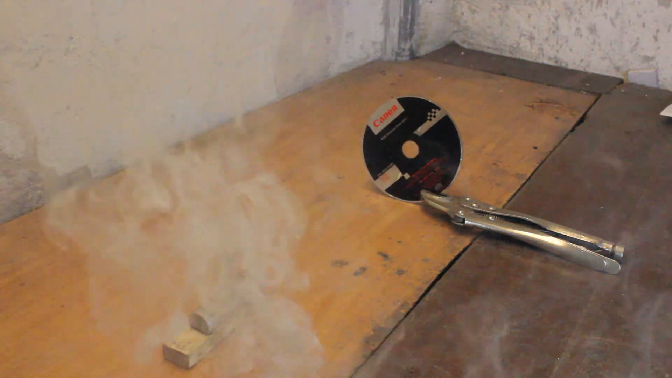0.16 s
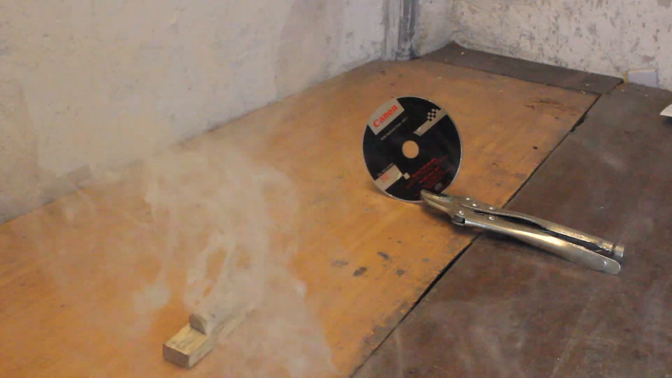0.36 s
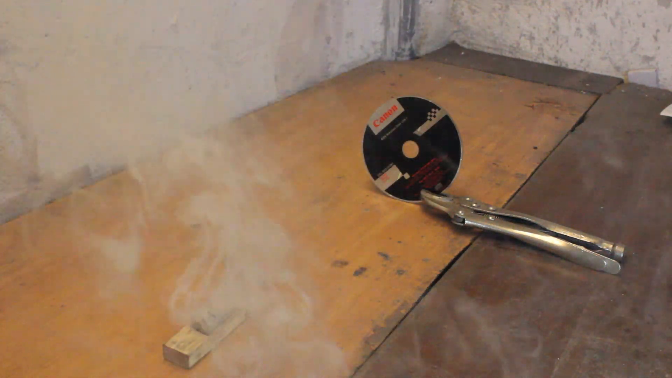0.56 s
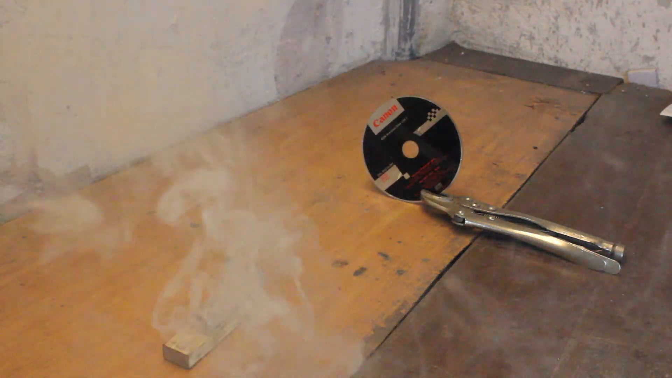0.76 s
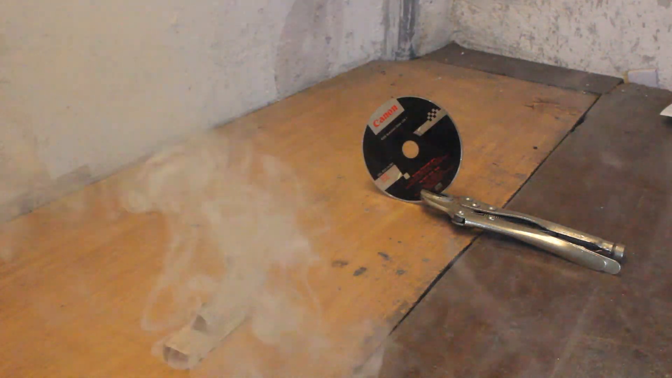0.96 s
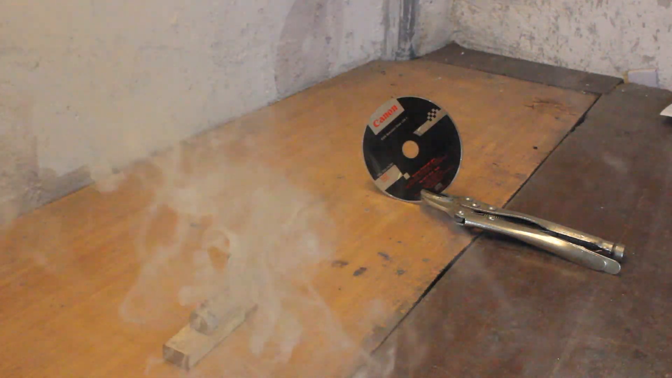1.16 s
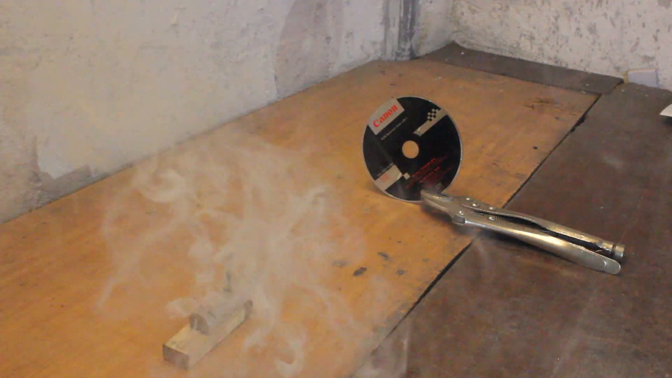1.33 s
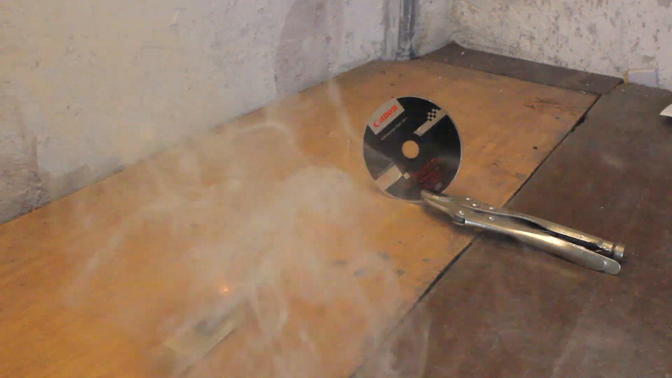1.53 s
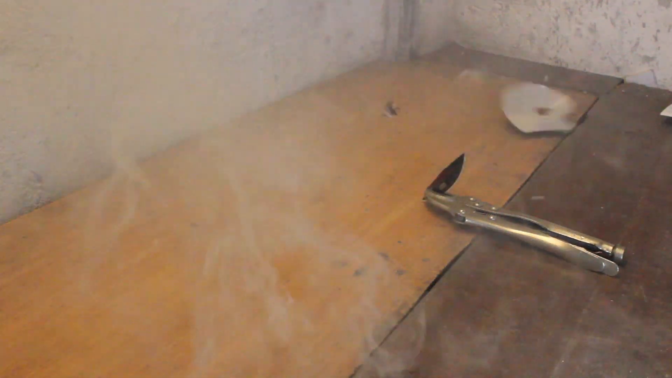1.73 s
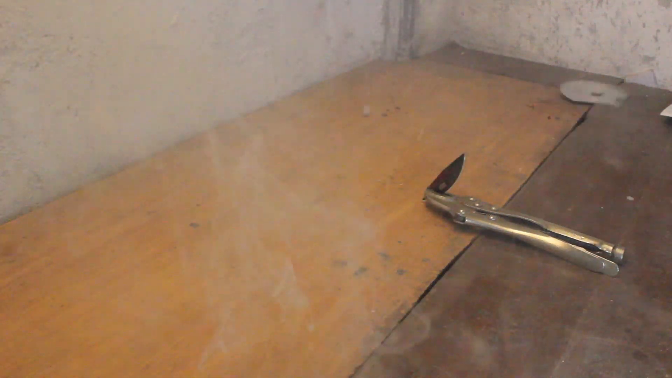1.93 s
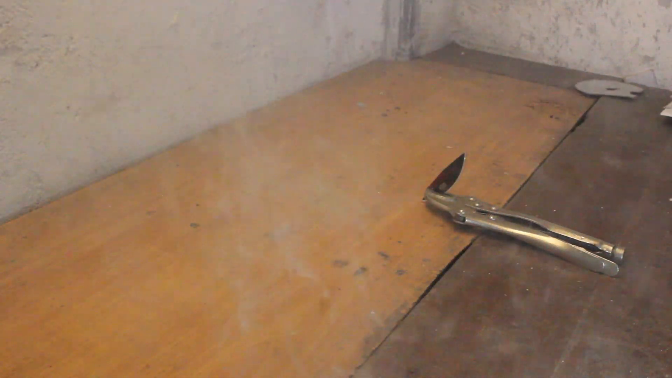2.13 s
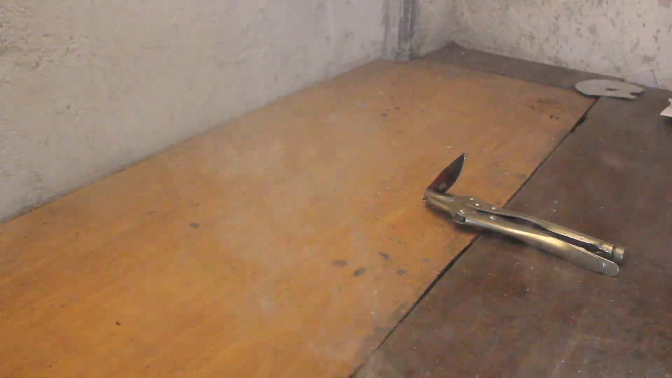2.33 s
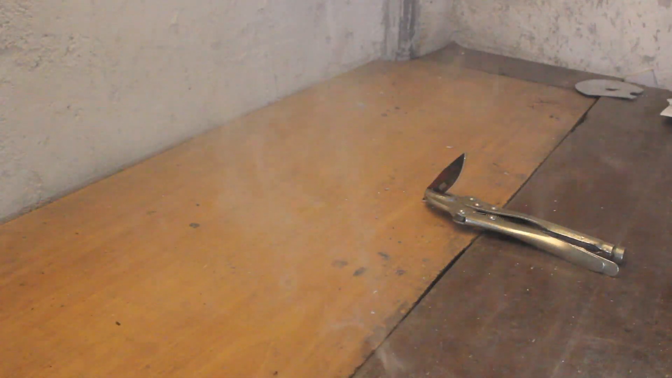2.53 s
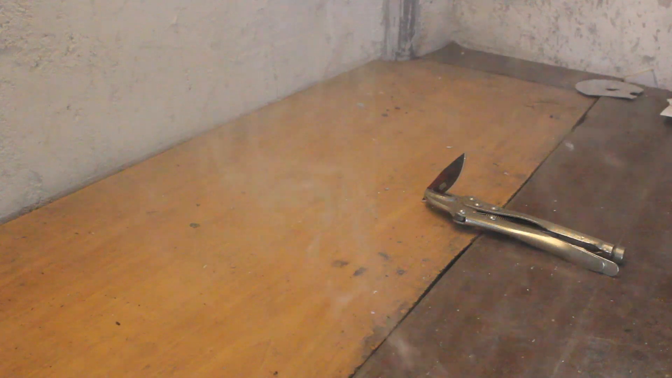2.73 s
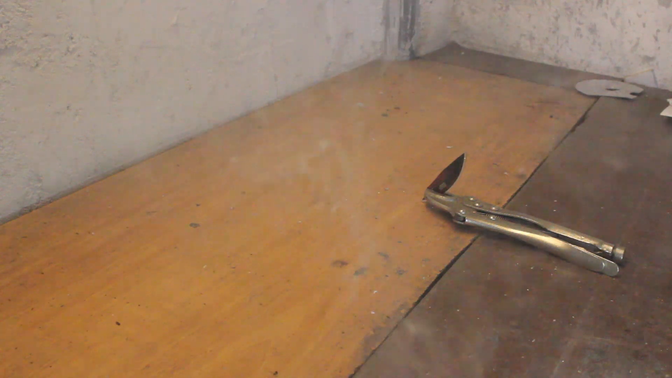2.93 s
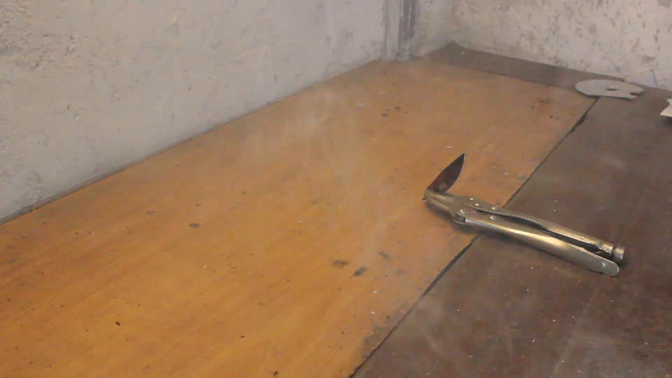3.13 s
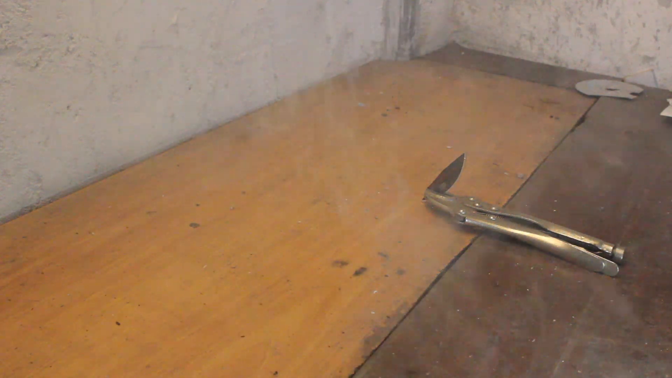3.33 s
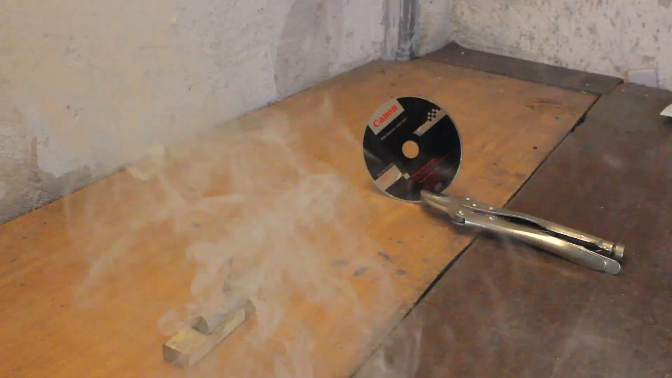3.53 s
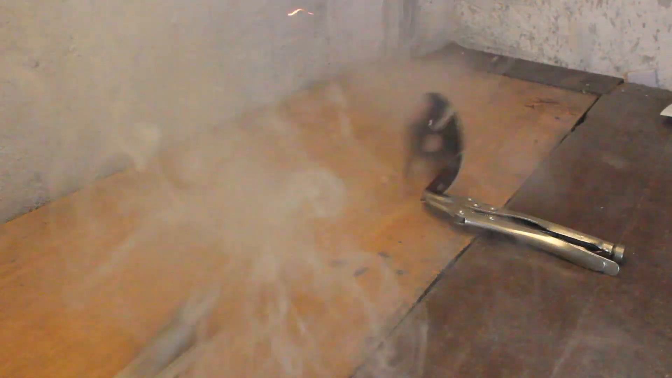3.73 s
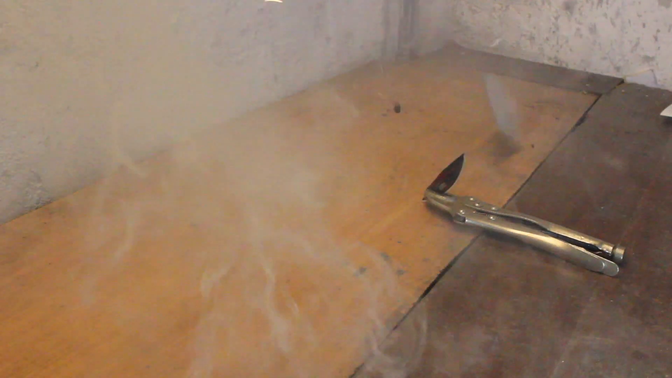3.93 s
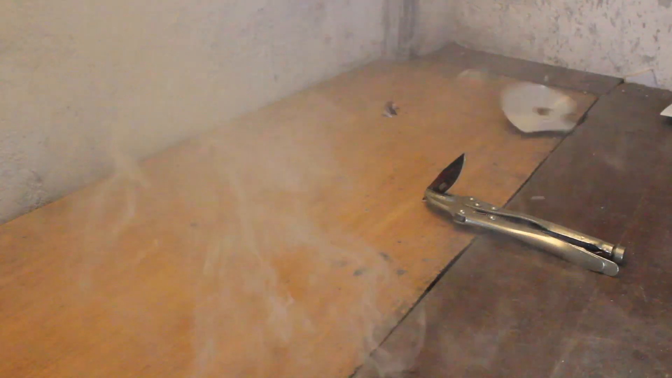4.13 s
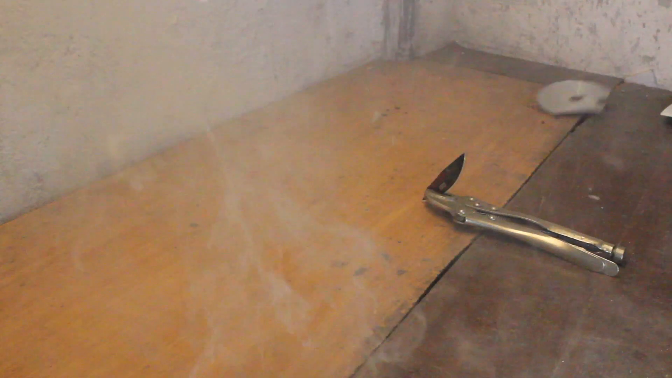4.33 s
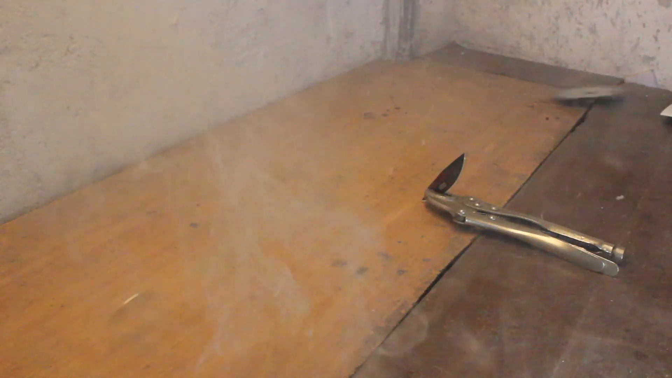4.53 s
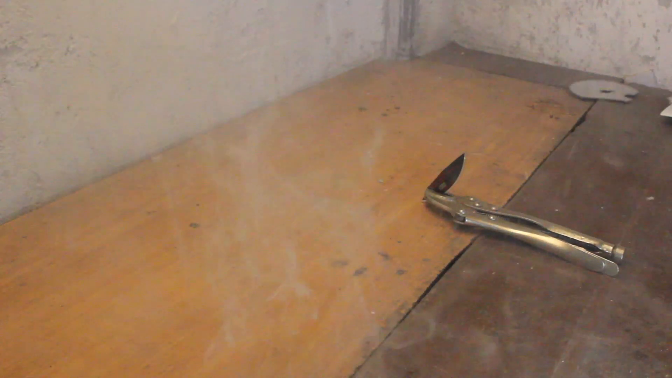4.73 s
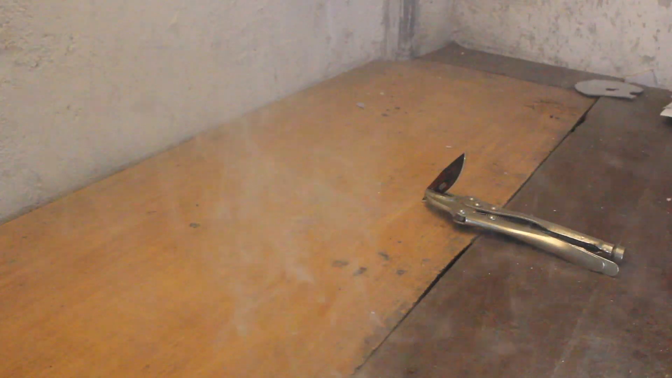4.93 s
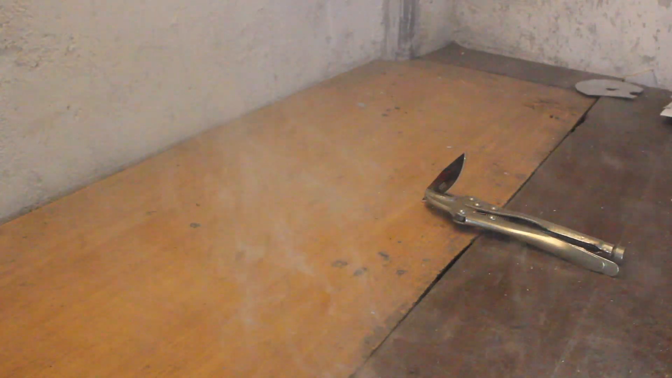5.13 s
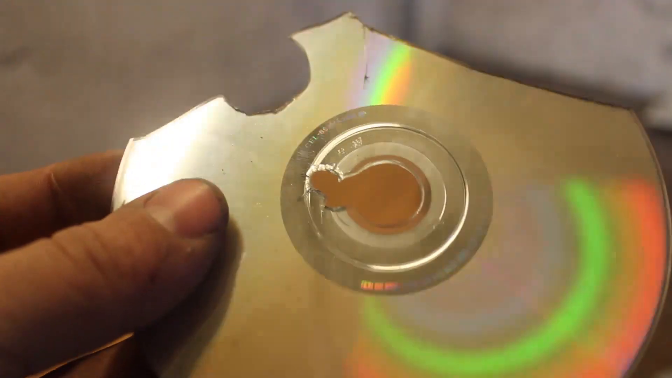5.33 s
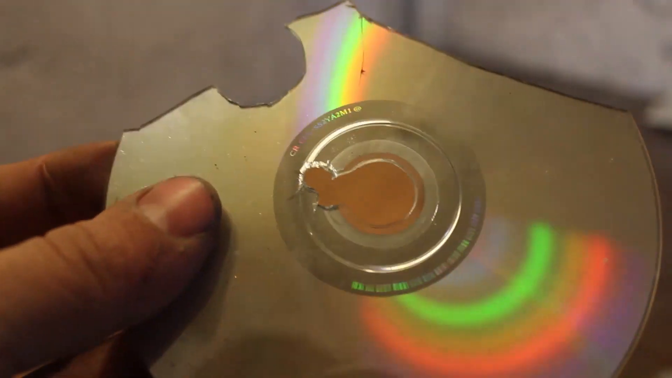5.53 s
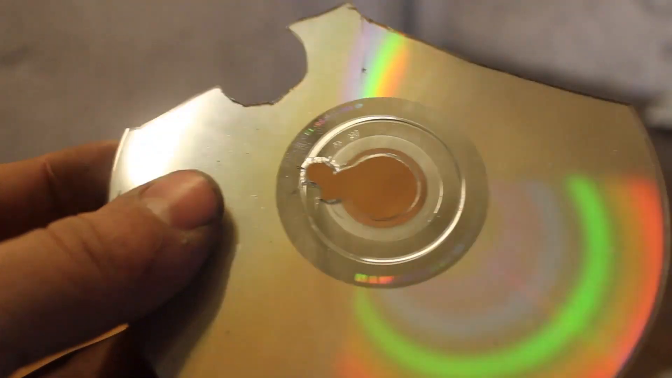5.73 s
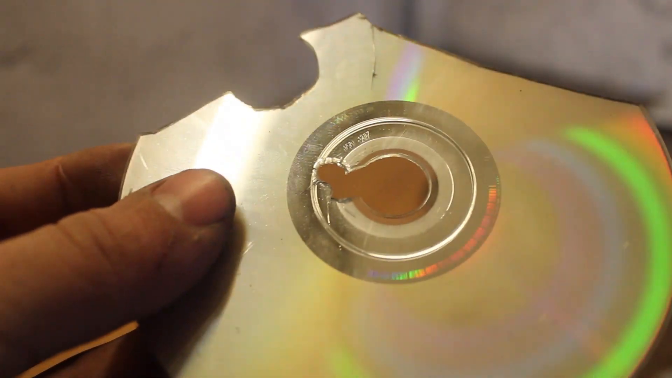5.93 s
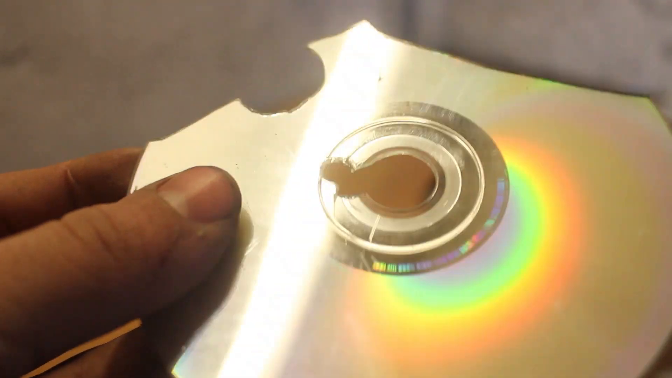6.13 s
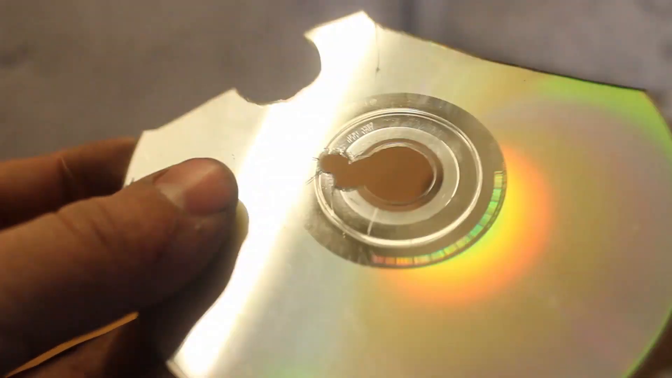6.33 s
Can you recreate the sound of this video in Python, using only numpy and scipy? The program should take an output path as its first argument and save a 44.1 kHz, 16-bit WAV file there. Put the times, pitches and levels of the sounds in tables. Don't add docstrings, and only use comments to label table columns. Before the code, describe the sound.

A bare workshop with low room hum and distant motor drone. From 0 s a small cannon on a bench hisses softly, a sputtering, airy whistle around 3 kHz with brief spits near 0.5, 1.2 and 1.35 s, and a small tick at 0.87. At 1.64 s it fires: an instant, clipped, very loud crack, then dense mid-heavy echo from hard walls and slow low bench rings, the level pulled down by the microphone's gain. From 1.9 to 2.75 s plastic shards click and patter, busiest from 2.1, with fine gritty ticks. The barrel's whistle swells again from about 2.8. At 3.47 s a cut to slowed sound: lower hiss, then at 3.79 a deeper, stretched boom with a long dragging echo and duller, widely spaced debris clicks from about 4.4. At 5.24 s it cuts abruptly to faint steady room tone until the end.

```python
import sys
import numpy as np
from scipy import signal
from scipy.fft import rfft, irfft
from scipy.io import wavfile
from scipy.ndimage import uniform_filter1d

SR = 44100
rng = np.random.default_rng(int(sys.argv[2]) if len(sys.argv) > 2 else 0)


def nominal_scale(level):
    x = np.asarray(level, float) / 20
    return 10 ** x


def persist_wave(psi):
    counts = np.round(np.clip(psi, -1, 1) * 32767).astype(np.int16)
    wavfile.write(sys.argv[1], SR, np.atleast_2d(counts).T)


N = 280917

CAMERA_RATE_HZ = 48000
TAKE_S = 3.5
M = round(TAKE_S * CAMERA_RATE_HZ)
SHOT_S = 1.6366
CLICK_S = .0008


def read(points, hz):
    f, value = np.transpose(points)
    return np.interp(np.log(hz + 1), np.log(f + 1), value)


def evened(x):
    return x / np.sqrt(np.mean(x ** 2) + 1e-20)


def noise(size):
    return rng.standard_normal(size)


def coloured(points, size, rate_hz, patchy_db):
    hz = np.fft.rfftfreq(1024, 1 / rate_hz)
    real, imag, patches = noise((size // 256 + 5, 513, 3)).T
    patches = uniform_filter1d(patches, 10, 0)
    patches = evened(uniform_filter1d(patches, 12, 1))
    z = (real + 1j * imag) * nominal_scale(read(points, hz)[:, None] + patchy_db * patches)
    return evened(signal.istft(z, nperseg=1024, noverlap=768)[1][:size])


def resonate(x, hz, width_hz):
    turn = np.exp(2j * np.pi * np.cumsum(hz * np.ones(len(x))) / CAMERA_RATE_HZ)
    r = np.exp(-np.pi * width_hz / CAMERA_RATE_HZ)
    return 2 * (turn * signal.lfilter([1 - r], [1, -r], x / turn)).real


def resonate_twice(x, hz, width_hz):
    return resonate(resonate(x, hz, width_hz), hz, width_hz)


def add(mix, s, sound):
    part = mix[round(s * CAMERA_RATE_HZ):][:len(sound)]
    part += sound[:len(part)]


BLAST_DB, BLAST_S = 14.5, .0004
CRACK_DB, CRACK_T60_S = 9.5, 0.07
# (frequency [Hz], level [dB])
ECHO = [(60, -14), (250, -1), (500, 6), (900, 11), (1400, 12), (4000, 5), (12000, -6), (24000, -16)]
# (frequency [Hz], t60 [s])
ECHO_T60 = [(60, .8), (250, .72), (1000, .6), (4000, .46), (7000, .4), (12000, .27), (24000, .16)]
# (time after shot [s], level [dB])
FAR_WALLS = [(0, 5), (.02, -10.5), (.06, -6.5), (.12, -3), (.2, -2), (.3, -3)]
LUMPY_DB, LUMP_S = 1.8, .012
BUILD_CYCLES = 47
FAR_DB, FAR_LONGER = -23.5, 1.3
# (frequency [Hz], level [dB], t60 [s])
BENCH_MODES = [(58.5, -5, 5), (62.8, -14, 4), (134, 0, 2.2), (144, -7, 2), (244, 0, 1.2), (404, -1, 1),
               (524, -5.5, 0.7), (818, -4.5, 0.5), (953, -8, .55), (1077, -8, 0.55), (2896, -9, 1.0),
               (3339, -17, 1.4)]
BENCH_DB, BENCH_SWELL_S = -20, .17


def shot(t):
    u = np.maximum(t - SHOT_S, 0)
    out = nominal_scale(BLAST_DB) * (1 - u / BLAST_S) * np.exp(-u / BLAST_S)
    out += nominal_scale(CRACK_DB - 60 * u / CRACK_T60_S) * evened(resonate(noise(M), 2500, 3800))

    late_db = np.interp(u, *np.transpose(FAR_WALLS))
    late_db += LUMPY_DB * evened(uniform_filter1d(noise(M), round(LUMP_S * CAMERA_RATE_HZ)))
    spectrum = rfft(noise(M))
    half_octave = 2 * np.log2(np.fft.rfftfreq(M, 1 / CAMERA_RATE_HZ) + 1)
    for centre in range(11, 30):
        hz = 2 ** (centre / 2)
        band = irfft(spectrum * np.cos(np.pi / 2 * np.clip(half_octave - centre, -1, 1)), M)
        fade_db = -60 * u / read(ECHO_T60, hz)
        fade = np.hypot(nominal_scale(fade_db), nominal_scale(FAR_DB + fade_db / FAR_LONGER))
        build = 1 - np.exp(-u * hz / BUILD_CYCLES)
        out += evened(band) * nominal_scale(read(ECHO, hz) + late_db) * fade * build

    swell = 1 - np.exp(-(u / BENCH_SWELL_S) ** 2)
    for (hz, db, t60), phase in zip(BENCH_MODES, rng.random(len(BENCH_MODES))):
        ring = np.sin(2 * np.pi * (hz * u + phase))
        out += swell * nominal_scale(BENCH_DB + db - 60 * (u - .3) / t60) * ring
    return out * (t >= SHOT_S)


FUSE_HZ, FUSE_DB, FUSE_ROAR_DB = 3050, -48.5, -1.5
# (time [s], whistle gain [dB], length [s])
FUSE_FLARES = [
    (.1, 2, .1),
    (.53, 6.5, .03),
    (1.186, 4.5, .05),
    (1.345, 9, .04),
    (1.5, 3, .1),
    (1.619, 7.5, .025),
]
FLARE_HZ_PER_DB = -1.5
# (time [s], whistle level [dB], pitch [Hz], roar re whistle [dB])
SMOULDER = [
    (2.0, -58.5, 3134, 22),
    (2.349, -64.5, 3140, 7),
    (2.599, -50.5, 3323, 3),
    (2.8, -49.5, 3210, 5),
    (2.899, -42.5, 3255, 0.5),
    (3.0, -39, 3140, 2.5),
    (3.46, -39, 3200, 3),
]
# (width [Hz], level [dB])
BARREL_STATES = [
    [(450, 1.5), (600, -11.5), (900, -23.5)],
    [(596, 2), (1200, -18), (1100, -24)],
]
BARREL_RATIOS = [1, 1.76, 2.85]
# (frequency [Hz], level [dB])
GAS_ROAR = [(150, -34.5), (500, 5.5), (1300, 1.5), (2300, 1), (4000, -10.5), (8000, -24.5), (20000, -37.5)]


def barrel(gas, hz, state):
    modes = zip(BARREL_RATIOS, state)
    return evened(sum(nominal_scale(db) * evened(resonate_twice(gas, k * hz, width)) for k, (width, db) in modes))


def hiss(t):
    flare_db = sum(db * np.exp(-((t - s) / length) ** 2) for s, db, length in FUSE_FLARES)
    fuse = FUSE_DB + flare_db, FUSE_HZ + FLARE_HZ_PER_DB * flare_db, FUSE_ROAR_DB
    s, *columns = np.transpose(SMOULDER)
    burning = t < SHOT_S
    level_db, hz, roar_db = (np.where(burning, f, np.interp(t, s, c)) for f, c in zip(fuse, columns))
    sputter = nominal_scale(1.2 * evened(uniform_filter1d(noise(M), 500)))
    gas = noise(M) * sputter
    loaded, emptied = (barrel(gas, hz, state) for state in BARREL_STATES)
    whistle = np.where(burning, loaded, emptied)
    return nominal_scale(level_db) * (whistle + nominal_scale(roar_db) * coloured(GAS_ROAR, M, CAMERA_RATE_HZ, .5))


# (time [s], peak level [dB], colour [Hz], room echo [dB])
TOUCHDOWNS = [(.871, -29.5, 5200, -18), (1.9075, -38.5, 17000, -32), (2.0005, -48.5, 13000, -28.5),
              (2.008, -35, 9500, -22.5), (2.032, -36, 13100, -23), (2.052, -45.5, 16000, -37),
              (2.1, -44, 9200, -25), (2.115, -48, 18000, -31.5), (2.1339, -23.5, 10800, -19),
              (2.208, -33, 6400, -18), (2.224, -60, 9200, -18), (2.233, -37.5, 8000, -22),
              (2.249, -41.5, 16000, -23.5), (2.255, -34.5, 16000, -28), (2.271, -35.5, 5000, -10.5),
              (2.28, -25, 8100, -15), (2.367, -21, 4970, -21), (2.386, -21, 3400, -14.5),
              (2.406, -28.5, 11000, -25), (2.435, -33.5, 12000, -34.5), (2.459, -20, 3050, -15.5),
              (2.5224, -26, 9900, -17.5), (2.571, -30, 5700, -14), (2.6272, -25.5, 8000, -19),
              (2.649, -31, 13200, -26.5), (2.692, -26, 10000, -17.5), (2.699, -29, 13000, -29.5),
              (2.72, -32, 12000, -31), (2.741, -32, 11000, -22), (2.745, -38.5, 13000, -25.5)]
SOFT_DB, SOFT_WIDTH, WIDER_PER_DB = -40, .55, .3
PATTER_T60_S = .35
# (time [s], frequency [Hz], width [Hz], level [dB], t60 [s])
SHARD_RINGS = [(1.9077, 14800, 400, -78, .35), (1.9093, 21500, 600, -62.5, .12),
               (2.032, 21000, 600, -64, .15), (2.134, 11400, 900, -71, .3), (2.249, 10800, 350, -54, .15),
               (2.255, 14800, 400, -59.5, .1), (2.28, 5420, 300, -45, 0.44),
               (2.282, 15300, 800, -42.5, 0.34), (2.459, 2430, 600, -41, 0.6),
               (2.458, 3900, 1200, -44, 0.51), (2.521, 11400, 400, -48, 0.092),
               (2.5244, 8700, 400, -57, .08), (2.647, 11500, 400, -47, 0.072),
               (2.699, 11500, 400, -57, 0.13)]


def shards():
    out = np.zeros(M)
    u = np.arange(CAMERA_RATE_HZ // 3) / CAMERA_RATE_HZ
    for s, db, hz, echo_db in TOUCHDOWNS:
        width_hz = SOFT_WIDTH * hz * nominal_scale(WIDER_PER_DB * (db - SOFT_DB))
        fade = np.exp(-u / CLICK_S) + nominal_scale(echo_db - 60 * u / PATTER_T60_S)
        add(out, s, nominal_scale(db) / 2 * fade * evened(resonate_twice(noise(len(u)), hz, width_hz)))
    for s, hz, width_hz, db, t60 in SHARD_RINGS:
        add(out, s, nominal_scale(db - 60 * u / t60) * evened(resonate_twice(noise(len(u)), hz, width_hz)))
    return out


GRIT_FROM_S, GRIT_TO_S, GRIT_PER_S = 1.8, 2.8, 120
GRIT_DB, GRIT_SPREAD_DB, GRIT_HZ = -64.5, 2.5, 9000


def crumbs(t):
    falling = (t > GRIT_FROM_S) & (t < GRIT_TO_S)
    hits = falling & (rng.random(M) < GRIT_PER_S / CAMERA_RATE_HZ)
    ticks = hits * nominal_scale(GRIT_DB + GRIT_SPREAD_DB * np.minimum(rng.exponential(1, M), 4))
    u = np.arange(2000) / CAMERA_RATE_HZ
    tick = noise(len(u)) * (np.exp(-u / CLICK_S) + nominal_scale(-28 - 60 * u / 0.067))
    return resonate(signal.oaconvolve(ticks, tick)[:M], GRIT_HZ, GRIT_HZ)


# (frequency [Hz], level [dB])
ROOM_AIR = [(12, -41.5), (20, -7.5), (92, 1), (166, -1.5), (213, -23), (266, 1.5), (298, -5), (352, -4.5),
            (565, -7), (649, -10), (1200, -11), (4680, -31.5), (15500, -43)]
ROOM_DB = -37.5
# (frequency [Hz], width [Hz], level [dB])
MACHINERY = [
    (251, 4.3, -48),
    (60, 15, -45),
    (3250, 62, -64.5),
]


def workshop():
    air = noise(M)
    drones = sum(nominal_scale(db) * evened(resonate_twice(air, hz, width)) for hz, width, db in MACHINERY)
    return nominal_scale(ROOM_DB) * coloured(ROOM_AIR, M, CAMERA_RATE_HZ, 1.3) + drones


def circuit(size):
    return evened(np.diff(noise(size + 1)))


WAIT_S, SNAP_S, SETTLE_S, HOLD_S, CREEP_S = .0118, .001, .02, .2, 0.68
SNAP_DB, SETTLE_DB, CREEP_DB = -3.6, -5.3, -9
RELEASE_AT_S, RECOVER_S, RECOVERED_DB = 2.75, 0.23, -2


def gain_control(t):
    def approach(start_s, tau_s):
        return 1 - np.exp(-np.maximum(t - start_s, 0) / tau_s)

    down_db = SNAP_DB * approach(SHOT_S + WAIT_S, SNAP_S)
    down_db += SETTLE_DB * approach(SHOT_S + WAIT_S, SETTLE_S)
    down_db += CREEP_DB * approach(SHOT_S + HOLD_S, CREEP_S)
    return down_db + (RECOVERED_DB - down_db) * approach(RELEASE_AT_S, RECOVER_S)


CIRCUIT_DB, TREBLE_DUCK = -57, 2.2
MIC_CUT_HZ, COUPLING_HZ, TOP_HZ = 200, 60, 23700
SAG, CEILING = 7, 1.33


def camera():
    t = np.arange(M) / CAMERA_RATE_HZ
    gain = nominal_scale(gain_control(t))
    tone = workshop() + nominal_scale(CIRCUIT_DB) * circuit(M)
    treble = signal.filtfilt(*signal.butter(2, 6000, "high", fs=CAMERA_RATE_HZ), tone)
    tone -= treble * (1 - gain ** TREBLE_DUCK)
    air = tone + shot(t) + (hiss(t) + shards() + crumbs(t)) / gain
    air = signal.lfilter(*signal.butter(1, MIC_CUT_HZ, "high", fs=CAMERA_RATE_HZ), air)
    flattened = np.clip(SAG * np.tanh(air / SAG), -CEILING, CEILING)
    coupling = signal.butter(1, [COUPLING_HZ, TOP_HZ], "band", fs=CAMERA_RATE_HZ)
    return signal.lfilter(*coupling, flattened) * gain


SLOW = 2.316
REPLAY_S, REPLAY_SHOT_S, CLOSEUP_S = 3.468, 3.787, 5.235
CLOSEUP_DB, CLOSEUP_CIRCUIT_DB, CLOSEUP_PATCHY_DB = -39.5, -67, 1.1


def scene():
    take = camera()
    normal = signal.resample(take, round(M * SR / CAMERA_RATE_HZ))
    slowed = signal.resample(take, round(M * SLOW * SR / CAMERA_RATE_HZ))
    out = nominal_scale(CLOSEUP_DB) * coloured(ROOM_AIR, N, SR, CLOSEUP_PATCHY_DB)
    out += nominal_scale(CLOSEUP_CIRCUIT_DB) * circuit(N)
    replay, closeup = round(REPLAY_S * SR), round(CLOSEUP_S * SR)
    shift = round((SHOT_S * SLOW - REPLAY_SHOT_S) * SR)
    out[:replay] = normal[:replay]
    out[replay:closeup] = slowed[replay + shift:closeup + shift]
    return out[None]


def band_limit(x):
    return signal.sosfilt(signal.butter(12, 16020, fs=SR, output="sos"), x)


def record(dry):
    mix = np.clip(dry, -1, 1)
    return band_limit(mix)


dry = scene()
out = record(dry)
persist_wave(out)
```